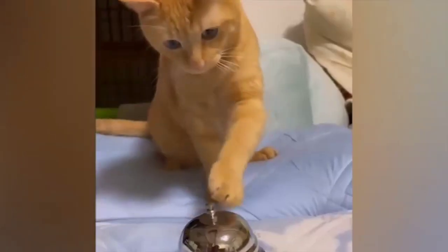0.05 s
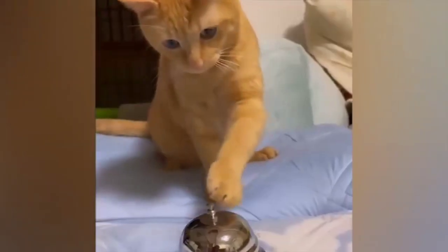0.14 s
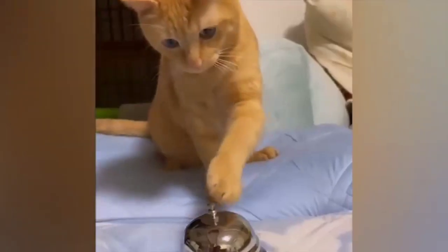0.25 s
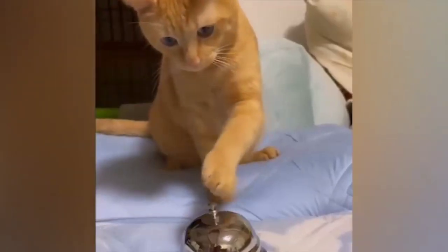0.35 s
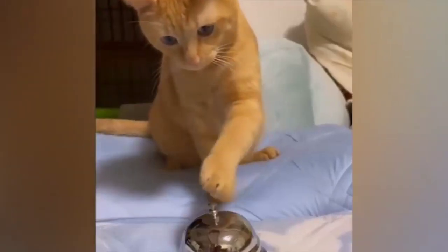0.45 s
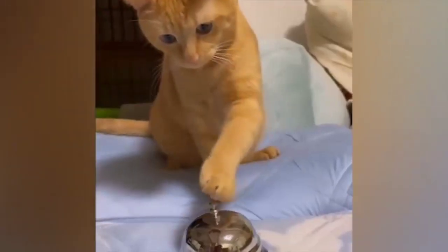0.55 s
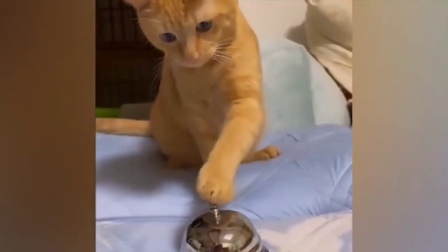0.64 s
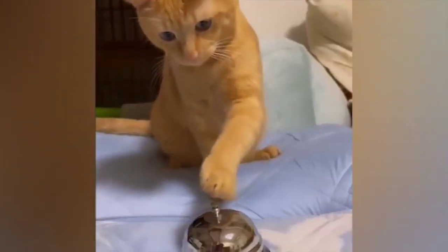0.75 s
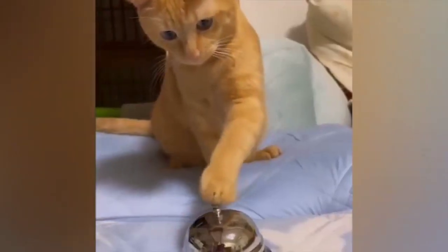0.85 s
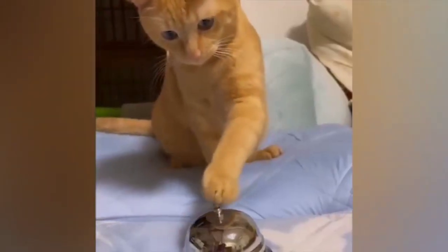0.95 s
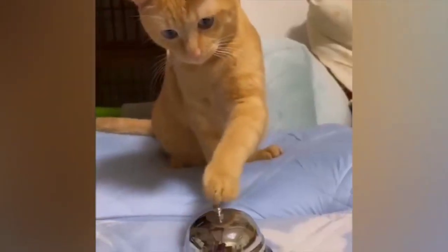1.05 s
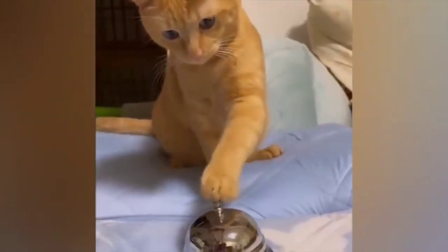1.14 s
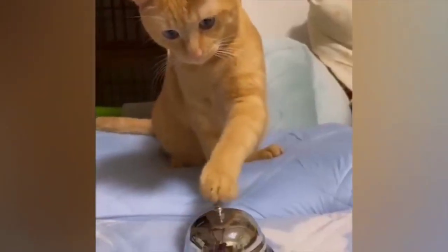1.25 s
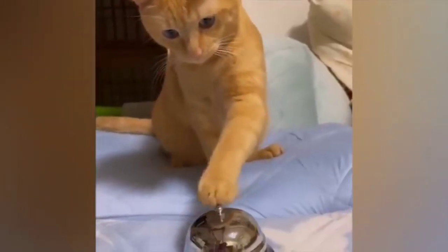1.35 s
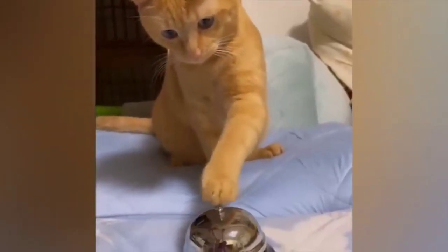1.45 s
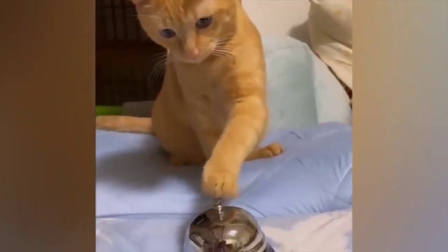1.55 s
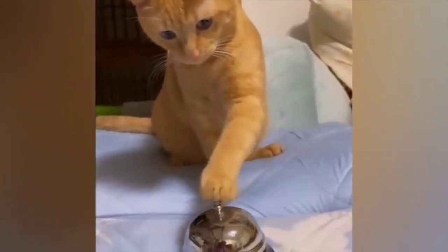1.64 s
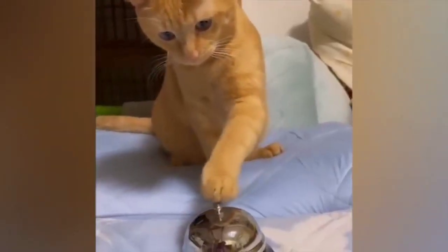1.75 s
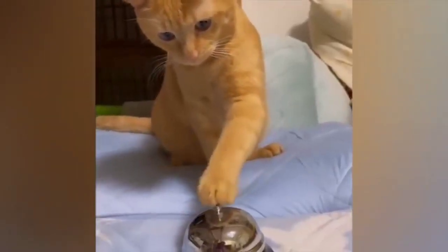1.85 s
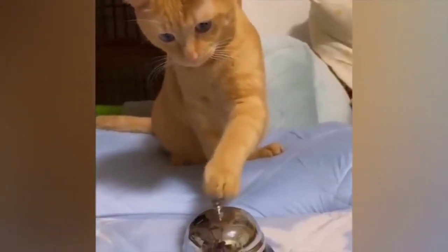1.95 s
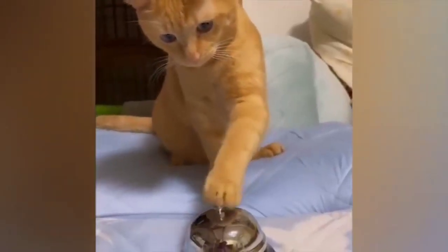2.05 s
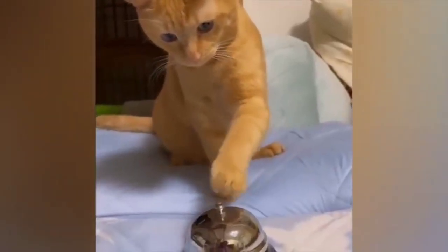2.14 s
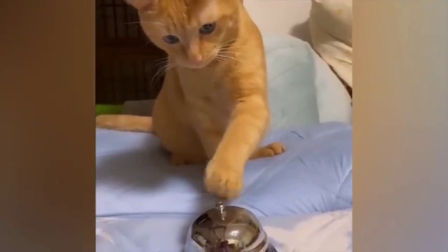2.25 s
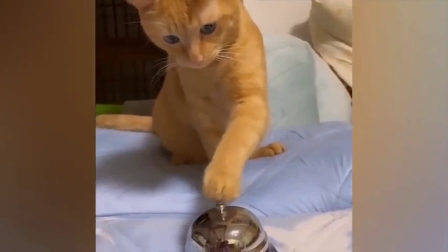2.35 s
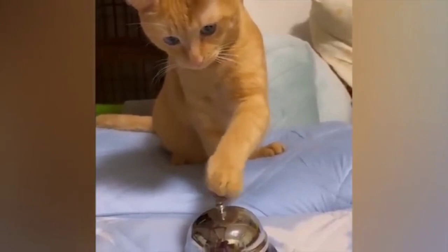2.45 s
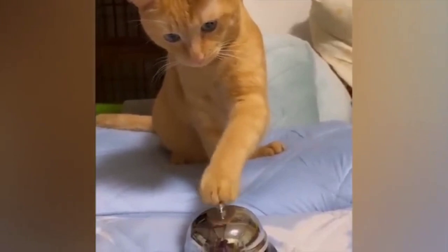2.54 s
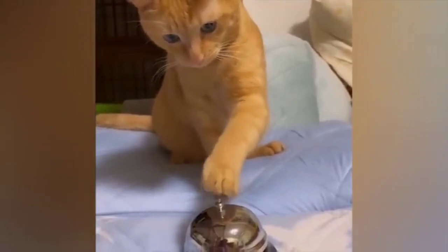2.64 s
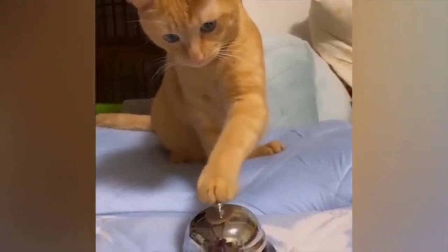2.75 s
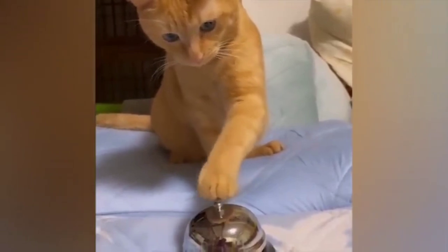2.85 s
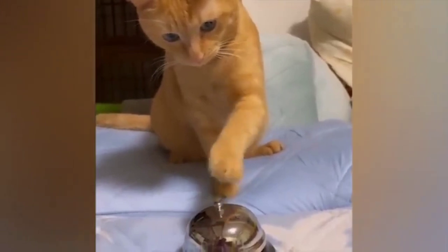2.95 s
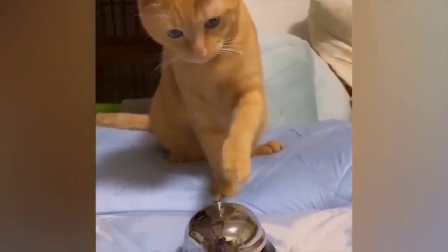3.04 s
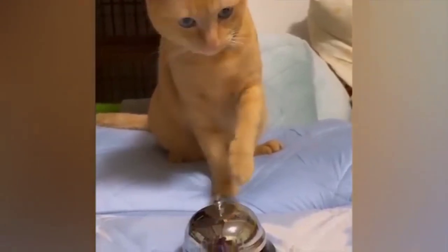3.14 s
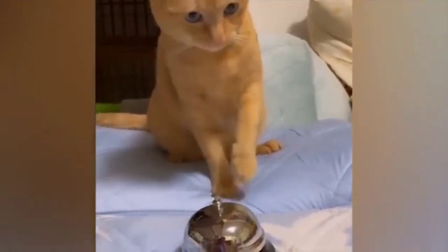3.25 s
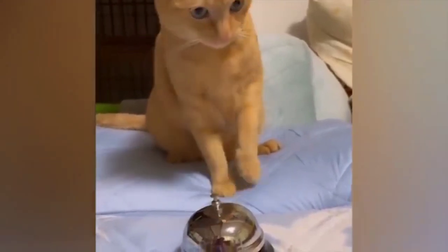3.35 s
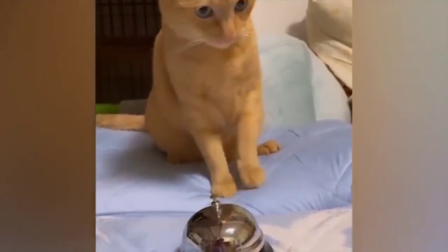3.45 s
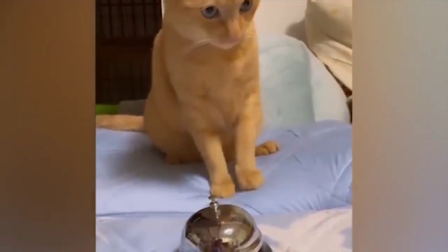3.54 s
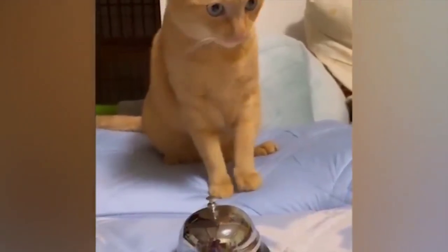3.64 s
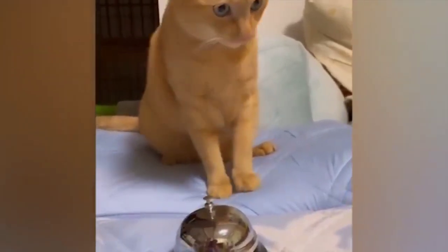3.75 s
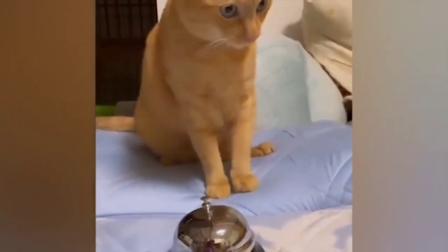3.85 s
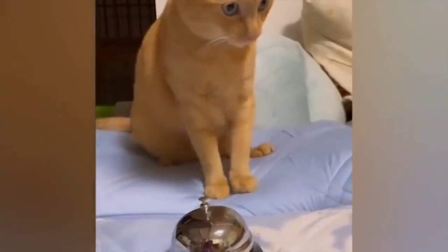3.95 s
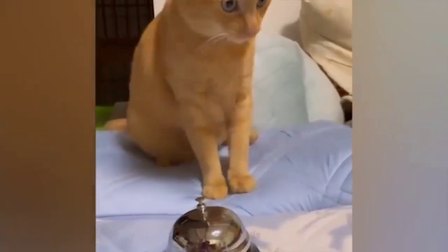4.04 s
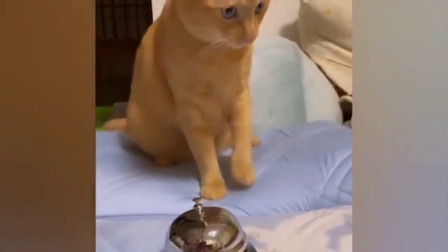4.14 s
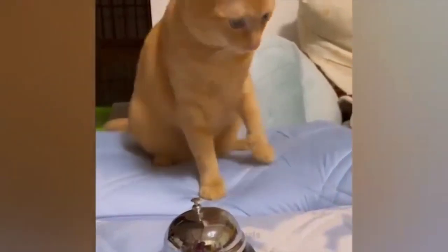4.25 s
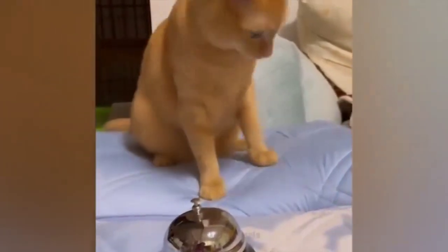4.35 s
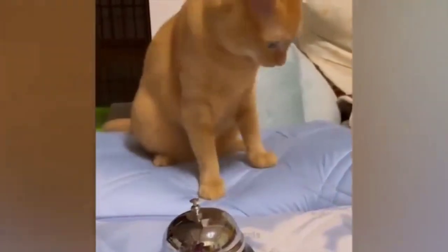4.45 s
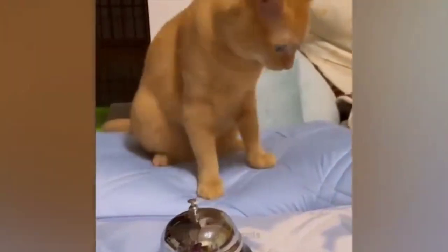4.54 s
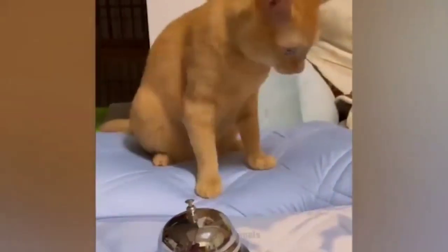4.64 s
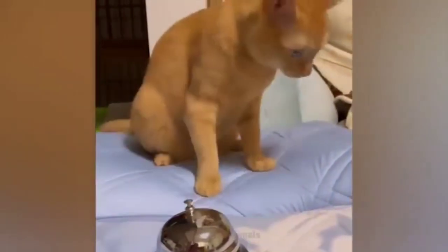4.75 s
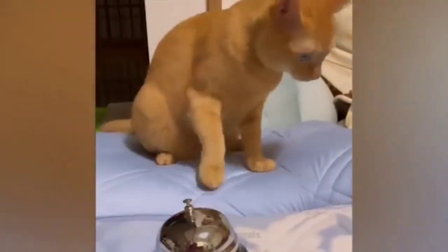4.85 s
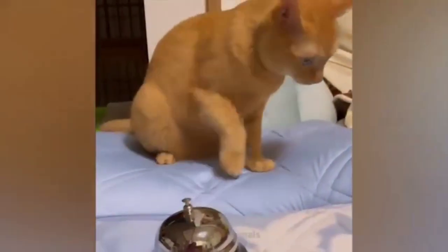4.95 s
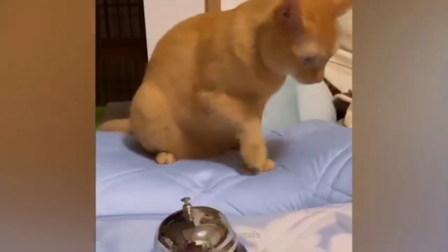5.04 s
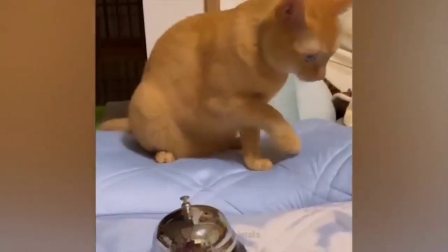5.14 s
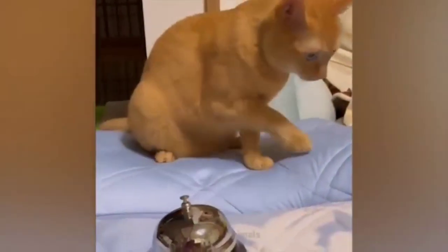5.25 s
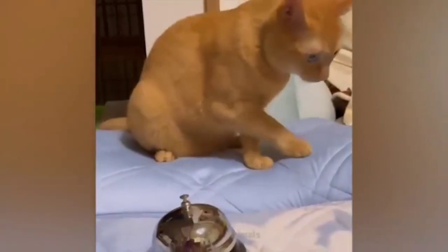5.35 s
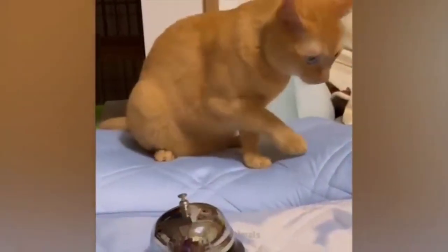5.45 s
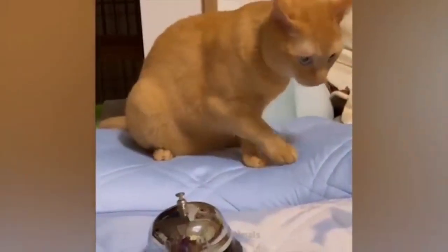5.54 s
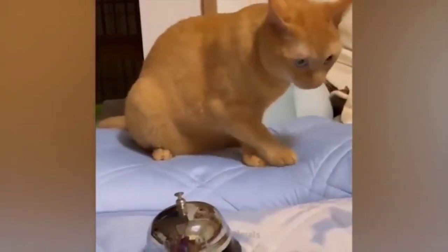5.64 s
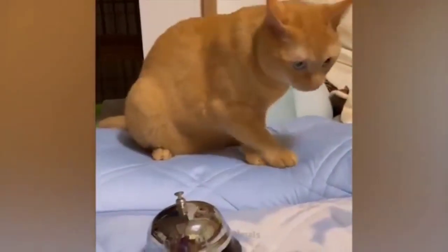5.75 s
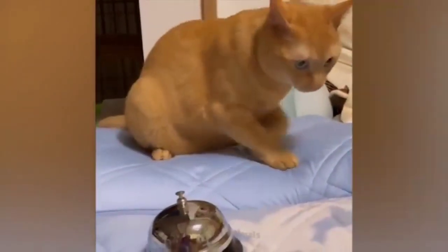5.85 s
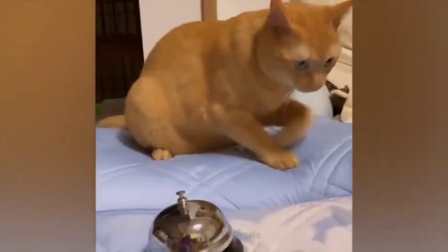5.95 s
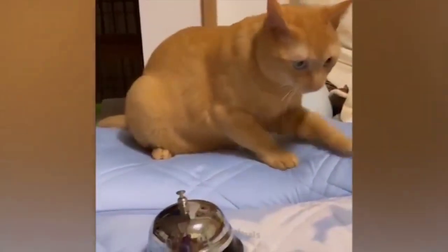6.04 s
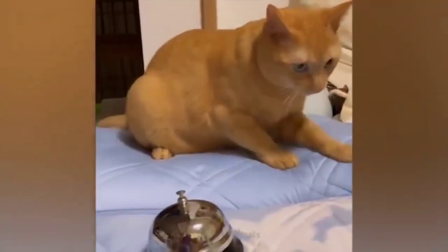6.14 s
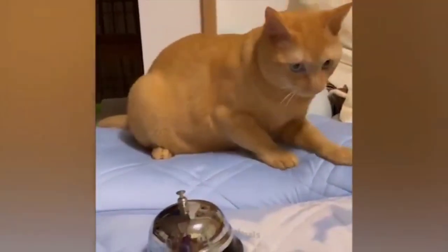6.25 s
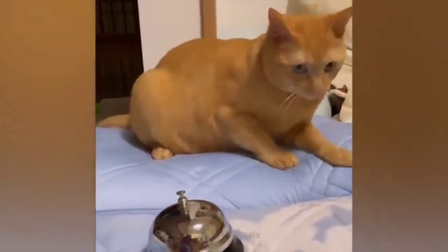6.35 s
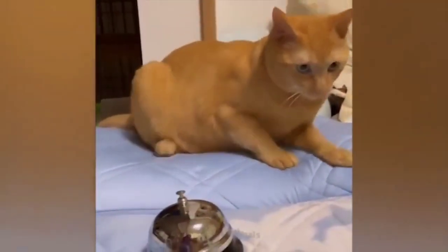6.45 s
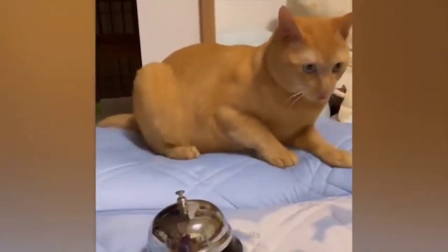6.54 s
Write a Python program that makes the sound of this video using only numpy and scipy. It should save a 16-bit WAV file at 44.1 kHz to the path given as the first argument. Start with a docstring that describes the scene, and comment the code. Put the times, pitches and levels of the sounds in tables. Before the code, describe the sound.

Loose metallic jingles and dull padded thumps, seven bright uneven dings from a desk bell, then a long shimmering fade in a quiet fan-hummed room.

```python
"""A steel desk bell on a quilt rings under a cat's paw: loose rattles, seven blows of the clapper, then the
dome rings out. Its close pairs of decaying sines beat; noisy contacts set the short modes of its loose parts
ringing, and the base thumps on the quilt. In the quiet room a fan drones, made of coloured noise and narrow
noise bands, and the quilt rustles in soft bright noise as the cat turns away."""
import sys
import numpy as np
from scipy import signal
from scipy.fft import rfft, irfft, next_fast_len
from scipy.io import wavfile

SR = 44100
rng = np.random.default_rng(int(sys.argv[2]) if len(sys.argv) > 2 else 0)


def int16_out(signal):
    """Quantize to a 16-bit WAV file."""
    q = np.round(np.clip(np.atleast_2d(signal).T, -1, 1) * 32767)
    wavfile.write(sys.argv[1], SR, q.astype(np.int16))


N = 290619

# Fan air noise: (frequency [Hz], relative density [dB per Hz])
AIR_SPECTRUM = [(25, -33), (60, -17.5), (100, -6), (145, -22.5), (230, -18), (280, -18), (350, -20.5),
                (520, -24.5), (700, -28.5), (1050, -27), (1400, -36), (2600, -43), (5000, -55),
                (11000, -73.5), (14000, -87)]
# Width of the air noise: (frequency [Hz], side minus mid [dB])
AIR_WIDTH = [(60, -39.5), (140, -44), (350, -14), (850, -5), (2040, -18), (4940, -1), (11900, -7)]
# Fan drone with the multiples of its turning rate: (frequency [Hz], bandwidth [Hz], level [dB])
FAN_DRONE = [(90.5, 4, -53.5), (119, 10, -56.5), (198, 16, -63), (313.5, 8, -58.5), (338, 8, -61),
             (363, 6, -66), (434, 4, -70), (457.5, 4, -69), (481, 4, -72)]
AIR_DB = -52.5  # rms of the mid signal

# Quilt and fur: (loudest time [s], level [dB], swell over 20 dB [s], fade over 20 dB [s])
CLOTH_MOVES = [(.866, -74, .035, 0.33), (4.198, -84, 0.16, 0.1), (5.03, -74.5, 1, 0.32),
               (5.84, -77.5, 0.06, .06), (5.97, -74.5, 0.18, 0.46), (6.45, -83, 0.13, 0.046)]
# Timbre of the cloth: (frequency [Hz], relative density [dB per Hz])
CLOTH_SPECTRUM = [(2500, -9.5), (4000, -1), (6500, -9.5), (9500, -6), (11000, -7), (12500, -12.5)]

# Plunger against its stop, with the thump of the base:
# (time [s], thump [dB], jingle [dB], dull modes against jingle [dB], tick drive [dB])
PLUNGER_KNOCKS = [(1.0250, -46.5, -38, -5.5, -24), (1.2158, -48.5, -46.5, -1, -25.5),
                  (1.3893, -43.5, -36, -7.5, -22), (1.704, -43, -38.5, -4, -23),
                  (1.842, -44.5, -56, -20, -28.5), (2.047, -43.5, -38, -10.5, -25.5),
                  (2.2204, -46, -50, -2, -29), (2.4042, -45.5, -39, -4, -22), (2.654, -43, -48, -2, -26),
                  (2.9051, -48.5, -38.5, -8.5, -27.5), (3.1307, -51.5, -49, -15, -41)]
# Loose plunger and clapper: (time [s], jingle [dB], dull modes against jingle [dB], patter t60 [s])
LOOSE_RATTLES = [(1.0104, -52, -10, 0.048), (1.059, -49, -11, 0.034), (1.152, -57.5, -5, .03),
                 (1.2815, -36.5, -5, 0.019), (1.3375, -34.5, -14.5, 0.047), (1.3988, -45.5, 3, .045),
                 (1.459, -32, -7.5, 0.017), (1.503, -44.5, -6, 0.033), (1.583, -55.5, 5.5, .045),
                 (1.607, -37, 1.5, 0.032), (1.7488, -27.5, -5, 0.07), (1.943, -64, 17, 0.031),
                 (2.0308, -42.5, -7, 0.093), (2.272, -46.5, -14, 0.091), (2.104, -47.5, -1, .045),
                 (2.1211, -22, -8.5, 0.043), (2.3117, -31.5, -1, 0.048), (2.357, -38, -1.5, 0.041),
                 (2.546, -33.5, -10, 0.13), (2.5655, -34, -5.5, 0.089), (2.7567, -32.5, -18, 0.026),
                 (2.7738, -23.5, -10.5, 0.021), (3.037, -32, -7, 0.049), (3.264, -53, -29, 0.063),
                 (3.287, -47.5, -32, 0.056), (3.325, -57, -3, 0.09)]
# Short modes of plunger, clapper and base: (frequency [Hz], relative level [dB], t60 [s])
FITTING_MODES = [(3198, 0.5, 0.0056), (3540, -7.5, 0.0099), (3580, -12.5, 0.013), (3993, -6.5, 0.026),
                 (4268, -16, 0.015), (4576, -5, 0.018), (4860, -12.5, 0.019), (5360, -9.5, 0.013),
                 (5720, -12, 0.0345), (6160, -14.5, 0.024), (6530, -5, 0.02), (6930, -4, 0.01),
                 (8180, -11, 0.011), (7750, -16, 0.01), (8890, -3.5, 0.048), (9480, 4.5, 0.011),
                 (9600, -7, .025), (10830, -3.5, 0.026), (11290, 0.5, 0.023), (12060, -10.5, 0.012)]
# Weak, brief dome modes: (frequency [Hz], level against clatter [dB], t60 [s])
WEAK_MODES = [(3500, -25, .18), (3800, -29, .15), (4072, -21.5, .17), (7150, -7, .05), (7420, -24, .12),
              (8889, -25, .25), (10455, -21, .3)]

# Clapper blows:
# (time [s], swing of the top mode [dB], opposite phase of the fourth pair lasts [s], snap against clatter [dB])
CLAPPER_BLOWS = [(1.6254, -19, 0.0072, 1.5), (1.7605, -11, 0.0033, 1), (2.1340, -13, 0.0062, 4),
                 (2.325, -15.5, 0.03, -2), (2.5805, -19.5, 0.01, 11), (2.788, -12.5, 0.017, 3.5),
                 (3.0477, -14, 0.012, 9)]
# Swing each blow leaves on the moving dome: (lower and upper mode of hum, second, third and fourth
# pair [dB] x 8, how far into their beat the second, third and fourth pair start [rad] x 3)
PAIR_SWINGS = [(-53, -57.5, -50.5, -56.5, -49.5, -47, -30, -28, -2.9, 0.8, 0.2),
               (-47.5, -48.5, -43.5, -48, -46, -41.5, -21.5, -28.5, -2, .8, 0.84),
               (-42.5, -53, -46.5, -51, -47.5, -39, -27.5, -25.5, 1.5, 0.6, .45),
               (-46.5, -53.5, -46, -47.5, -36, -42, -21.5, -48, 2.5, 0.45, .1),
               (-53, -50.5, -43, -43.5, -60, -45.5, -24, -29, -1.6, 1, .4),
               (-47.5, -48.5, -41.5, -48, -58, -43, -23.5, -27, 3, 1.1, 0.9),
               (-43.5, -63.5, -41, -48.5, -50, -46, -25, -25, -1.77, 1.5, 0.51)]

# The dome is not quite round, so modes come as close pairs that beat. The order of all mode tables is:
# hum, second, third and fourth pair, top mode, three side tones of the third. (frequency [Hz])
MODE_HZ = [934.6, 963.6, 2488.0, 2489.87, 4600.55, 4608.33, 7250.6, 7255.3, 10374.8, 4592.8, 4616.1,
           4623.85]
# Decay and stereo place of each mode: (t60 [s], left minus right [dB], left leads [rad])
MODE_DECAY_AND_PLACE = [(13.5, 2.47, -0.1), (5.3, -1.5, 0.2), (7.9, -5.5, 1.4), (6.1, 3, 2.1),
                        (2.6, -11, -0.35), (2.7, 5, -0.9), (1.08, 1.5, 0.0), (1.05, -0.5, 0.25),
                        (0.47, 0, 0.2), (2.4, 7, -1.7), (2.4, 8, -0.1), (2.4, 4, -1.1)]
# Most modes restart at a blow while the hum swings on: (restarts [0 or 1])
MODE_RESTARTS = [0, 0, 1, 1, 1, 1, 1, 1, 1, 1, 1, 1]
# Which swing sets the mode: (column of PAIR_SWINGS, with the blow's strength added last [index])
MODE_SWING_COLUMN = [0, 1, 2, 3, 4, 5, 6, 7, 11, 5, 5, 5]
# Which beat start sets the lower mode of a pair ahead: {mode [index]: column of PAIR_SWINGS [index]}
MODE_BEAT_COLUMN = {2: 8, 4: 9, 6: 10}
# Faint side tones follow the third tone: (offset [dB])
SIDE_TONE_DB = [0, 0, 0, 0, 0, 0, 0, 0, 0, -12, -9, -15.5]
# Where the side tones start: (phase [rad])
MODE_AHEAD_RAD = [0, 0, 0, 0, 0, 0, 0, 0, 0, -.6, 1.5, -1.2]
# Random slow level waver of each mode: (spread [dB])
MODE_WAVER_DB = [.2, .2, .3, .3, 1.0, 1.0, 1.5, 1.5, .7, 1.0, 1.0, 1.0]
# The pressing paw changes the modes just before the next blow, muffling most: (change [dB])
MODE_MUFFLE_DB = [1.5, -3, -2, -1.5, -4, 1.5, -18.5, -26.5, 1, -5.5, -4, -3.5]
# Level change at the blow that fades as the mode rings: (change [dB])
MODE_EARLY_DB = [-2, -2.5, 2, 1.5, -3, 1.5, -7, -2, 2.5, -0.5, -0.5, 0]
# How fast that change fades, for modes below and above BRIGHT_FROM_HZ: (time constant [s])
EARLY_FADE_S = [0.0493, 0.0081]
# Regular level swing laid over the fourth pair, timed from each blow: (peak swing [dB])
MODE_LEVEL_SWING_DB = [0, 0, 0, 0, 0, 0, 3.5, 3.5, 0, 0, 0, 0]
# Left and right start in opposite phase for this pair: (opposite [0 or 1])
MODE_OPPOSITE_START = [0, 0, 0, 0, 0, 0, 1, 1, 0, 0, 0, 0]

WAVER_PER_S, MUFFLE_S = 35, 0.03
LEVEL_SWING_PER_S, LEVEL_SWING_LAG_S = 22.5, 0.019  # lag from the blow to the top of the swing
OPPOSITE_RAD, OPPOSITE_DB = 3.13, 3
BRIGHT_FROM_HZ = 7500  # splits bright modes from dull ones

TOUCHES_PER_S, SHAKE_RISE_S = 520, 0.003
PATTER_T60_S, BLOW_PATTER_T60_S = 0.084, 0.064
BRIGHT_DB = -4  # bright modes against the jingle of a rattle or knock
CLATTER_DB = -12.5  # clatter against the strength of a blow
HIT_COLOUR_DB = 5.5  # spread of each mode's share from one hit to the next
BOUNCE_S, BOUNCE_DB, BOUNCE_DULL_DB = 0.022, -15, 6.5  # the clapper falls back after each blow
JINGLE_LEAD_S = 0.0025  # the plunger jingles just before it meets its stop
LEAD_IN_DB, LEAD_IN_S = -12.5, 0.052  # soft noisy lead-in that rises 60 dB in this time before each hit
SWELL_T60_S = 0.0055  # padded contacts let the small modes swell briefly
TICK_HZ, TICK_T60_S, TICK_LAG_S = 2026, 0.0023, 0.00089
RATTLE_TICK_DB = 4  # tick drive against the dull modes
PARTS_LOWEST_HZ = 650  # the small parts radiate no bass

THUMP_HZ, THUMP_T60_S = 618, 0.036
THUD_HZ, THUD_T60_S, THUD_DB = 199, 0.058, 4  # the quilt under the base, against the thump
ROOM_T60_S, ROOM_DB, ROOM_DULL_HZ, ROOM_WIDE_HZ = 0.24, -7.5, 5700, 2000
CUTOFF_HZ = 12700


def amp(db):
    """Turn decibels into gain."""
    return 10 ** (np.asarray(db) / 20)


def rms_one(x):
    """Scale to rms 1."""
    return x / np.sqrt(np.mean(x ** 2) + 1e-20)


def coloured(points, channels):
    """Shape white noise to a spectrum of (frequency [Hz], level [dB]) points."""
    size = next_fast_len(N)
    hz = np.maximum(np.arange(size // 2 + 1) * SR / size, 1)
    at, level_db = np.transpose(points)
    colour = amp(np.interp(np.log(hz), np.log(at), level_db))
    white = rng.standard_normal((channels, size))
    return irfft(rfft(white) * colour, size)[:, :N]


def drift(rate):
    """Low-pass noise twice into a slow random wander of spread 1; rate is the corner in Hz."""
    r = np.exp(-2 * np.pi * rate / SR)
    wander = signal.lfilter([1], [1, -2 * r, r * r], rng.standard_normal(N + SR))
    return rms_one(wander[SR:])  # drop the filter's start


def ring(clicks, hz, t60):
    """A two-pole resonance: a unit click sets a dying sine of height 1 ringing."""
    r, w = amp(-60 / (t60 * SR)), 2 * np.pi * hz / SR
    return signal.lfilter([0, np.sin(w)], [1, -2 * r * np.cos(w), r * r], clicks + 1e-18)


def smooth(x, time_s):
    """Ease jumps with a one-pole lag of this time constant."""
    r = np.exp(-1 / (time_s * SR))
    return signal.lfilter([1 - r], [1, -r], x)


def clicks_at(times, db):
    """Place one click at each time."""
    out = np.zeros(N)
    out[np.round(np.asarray(times) * SR).astype(int)] = amp(db)
    return out


def fan():
    """Broad air noise, its width varying with pitch, and a wavering drone of narrow noise near the middle."""
    at, level_db = np.transpose(AIR_SPECTRUM)
    width_hz, width_db = np.transpose(AIR_WIDTH)
    side_db = level_db + np.interp(np.log(at), np.log(width_hz), width_db)
    mid = coloured(AIR_SPECTRUM, channels=1)[0]
    side = coloured(np.c_[at, side_db], channels=1)[0]
    air = amp(AIR_DB) / np.std(mid) * (mid + side * [[1], [-1]])
    drone = np.zeros(N)
    for hz, width, tone_db in FAN_DRONE:
        t60 = np.log(1000) / (np.pi * width)
        band = ring(ring(rng.standard_normal(N + SR), hz, t60), hz, t60)
        drone += amp(tone_db) * rms_one(band[SR:])
    return air + drone * amp([[0.15], [-0.15]])


def rustle(patchy_db=1.5):
    """Fur and paws on cloth: soft bright noise in patches."""
    t = np.arange(N) / SR
    level = np.zeros(N)
    for peak, db, swell, fade in CLOTH_MOVES:
        distance = np.where(t < peak, (peak - t) / swell, (t - peak) / fade)
        level += amp(db - 20 * distance)
    mid, side = rms_one(coloured(CLOTH_SPECTRUM, channels=2))
    return level * amp(patchy_db * drift(19)) * (mid + 0.4 * side * [[1], [-1]])


def room(x):
    """A dense dull tail, alike at both microphones in the bass and different in the treble."""
    t = np.arange(SR // 2) / SR
    tail = rng.standard_normal((2, len(t))) * amp(-60 * t / ROOM_T60_S)
    tail *= t > 0.004  # short gap before the reflections
    mid, side = signal.sosfilt(signal.butter(1, ROOM_DULL_HZ, fs=SR, output="sos"), tail)
    side = signal.sosfilt(signal.butter(2, ROOM_WIDE_HZ, "high", fs=SR, output="sos"), side)
    tail = (mid + side * [[1], [-1]]) / np.sqrt(np.sum(mid ** 2 + side ** 2))
    return amp(ROOM_DB) * signal.fftconvolve(x[None], tail, axes=1)[:, :N]


def thumps(times, db):
    """The hollow base answers a knock with a rounded tone that swells before it dies, over a quilt thud."""
    thud = ring(clicks_at(times, db + THUD_DB), THUD_HZ, THUD_T60_S)
    once = ring(clicks_at(times, db), THUMP_HZ, THUMP_T60_S)
    level = 2 * np.e * np.log(1000) / (THUMP_T60_S * SR)  # brings the swell to a height near 1
    return thud + level * ring(once, THUMP_HZ, THUMP_T60_S)


def shaking(times, db, t60):
    """How hard the loose parts shake: a soft lead-in, a quick rise at each time, then a fall."""
    t, out = np.arange(SR // 5) / SR, np.zeros(N)
    for start, level_db, fall in zip(times, db, t60):
        at = round(start * SR)
        out[at - len(t):at] += amp(level_db + LEAD_IN_DB - 60 * t[::-1] / LEAD_IN_S)
        rise = 1 - np.exp(-t / SHAKE_RISE_S)
        out[at:at + len(t)] += rise * amp(level_db - 60 * t / np.clip(fall, 0.01, 0.15))
    return out


def contacts(times, uneven_db=4.5):
    """Loose parts touch at random with uneven force, plus one sure touch for each hit."""
    force_db = uneven_db * np.minimum(rng.exponential(1, N), 3) - 12.5
    touches = (rng.random(N) < TOUCHES_PER_S / SR) * amp(force_db)
    return touches + clicks_at(times + SHAKE_RISE_S, 0.7)


def fittings():
    """Rattles, knocks and blows shake the loose parts: uneven, fading contacts ring short modes."""
    rattles, knocks, blows = np.array(LOOSE_RATTLES), np.array(PLUNGER_KNOCKS), np.array(CLAPPER_BLOWS)
    blow_s, clatter_db = blows[:, 0], blows[:, 1] + CLATTER_DB
    bounces = [(s + BOUNCE_S, db + BOUNCE_DB, BOUNCE_DULL_DB, PATTER_T60_S)
               for s, db in zip(blow_s, clatter_db)]
    rattles = np.r_[rattles, bounces]
    rattle_s, rattle_db, rattle_dull_db, rattle_t60 = rattles.T
    knock_s, _, knock_db, knock_dull_db, knock_tick_db = knocks.T

    times = np.r_[rattle_s, knock_s - JINGLE_LEAD_S, blow_s]
    t60s = np.r_[rattle_t60, np.full(len(knocks), PATTER_T60_S), np.full(len(blows), BLOW_PATTER_T60_S)]
    bright_db = np.r_[rattle_db + BRIGHT_DB, knock_db + BRIGHT_DB, clatter_db - 17.5]
    dull_db = np.r_[rattle_db + rattle_dull_db, knock_db + knock_dull_db, clatter_db - 13.5]
    # no two hits stir the modes alike
    colour_db = HIT_COLOUR_DB * rng.standard_normal((len(times), len(FITTING_MODES)))
    touches = contacts(times)
    patter = np.zeros(N)
    for k, (hz, level_db, t60) in enumerate(FITTING_MODES):
        hit_db = (bright_db if hz > BRIGHT_FROM_HZ else dull_db) + colour_db[:, k]
        drive = shaking(times, hit_db, t60s) * touches * rng.standard_normal(N)
        patter += amp(level_db) * ring(ring(drive, hz, t60), hz, SWELL_T60_S)
    patter *= 3 * np.log(1000) / (SWELL_T60_S * SR)  # offsets the gain of the second resonance

    tick_s = np.r_[rattle_s + SHAKE_RISE_S, knock_s + TICK_LAG_S, blow_s]
    tick_db = np.r_[rattle_db + rattle_dull_db + RATTLE_TICK_DB, knock_tick_db, clatter_db - 12]
    # two resonances in a row: a soft contact swells for a cycle
    once = ring(clicks_at(tick_s, tick_db), TICK_HZ, TICK_T60_S)
    ticks = amp(-20) * ring(once, TICK_HZ, TICK_T60_S)

    steel = clicks_at(blow_s, clatter_db)  # steel on steel
    crack = amp(7.5) * ring(steel, 2700, 0.0008) + amp(-4.0) * ring(steel, 10960, 0.0012)
    snap = clicks_at(blow_s, clatter_db + blows[:, 3])
    crack += amp(3.5) * ring(snap, 9173, 0.0069)
    thin = signal.butter(2, PARTS_LOWEST_HZ, "high", fs=SR, output="sos")
    return signal.sosfilt(thin, patter + ticks + crack)


def overtones():
    """Each blow strikes the weak modes with strengths of its own."""
    blows = np.array(CLAPPER_BLOWS)
    luck_db = rng.normal(0, 2.5, (len(blows), len(WEAK_MODES)))
    out = np.zeros(N)
    for k, (hz, db, t60) in enumerate(WEAK_MODES):
        strike_db = blows[:, 1] + CLATTER_DB + db + luck_db[:, k]
        out += ring(clicks_at(blows[:, 0], strike_db), hz, t60)
    return out


def dome(rise_s=0.000506, muffle_rise_s=0.003):
    """Every blow leaves each mode with a new swing, which then dies away; close pairs beat."""
    blows, t, out = np.array(CLAPPER_BLOWS), np.arange(N) / SR, np.zeros((2, N))
    blow_s = blows[:, 0]
    swings = np.c_[PAIR_SWINGS, blows[:, 1]]
    last = np.searchsorted(blow_s, t) - 1  # latest blow, -1 before the first
    since = np.maximum(t - blow_s[np.maximum(last, 0)], 0)
    until = np.r_[blow_s, np.inf][last + 1] - t
    muffled = smooth(1.0 * (until < MUFFLE_S), muffle_rise_s) * (since > MUFFLE_S)
    level_swing = np.cos(2 * np.pi * LEVEL_SWING_PER_S * (since - LEVEL_SWING_LAG_S))
    for k, (hz, (t60, pan_db, lead)) in enumerate(zip(MODE_HZ, MODE_DECAY_AND_PLACE)):
        swing_db = swings[last, MODE_SWING_COLUMN[k]] + SIDE_TONE_DB[k] - 60 * since / t60
        swing_db += MODE_MUFFLE_DB[k] * muffled
        swing_db += MODE_EARLY_DB[k] * np.exp(-since / EARLY_FADE_S[int(hz > BRIGHT_FROM_HZ)])
        swing_db += MODE_LEVEL_SWING_DB[k] * level_swing
        swing = smooth((last >= 0) * amp(swing_db), rise_s)
        swing = swing * amp(MODE_WAVER_DB[k] * drift(WAVER_PER_S))

        clock = since if MODE_RESTARTS[k] else t - blow_s[0]
        phase = MODE_AHEAD_RAD[k] + 2 * np.pi * hz * clock
        if k in MODE_BEAT_COLUMN:
            phase = phase + swings[last, MODE_BEAT_COLUMN[k]]
        opposite = smooth(1.0 * (since < MODE_OPPOSITE_START[k] * blows[last, 2]), rise_s)
        swing = swing * amp(OPPOSITE_DB * opposite)
        lead = lead + OPPOSITE_RAD * opposite
        for side, sign in enumerate((1, -1)):
            out[side] += amp(sign * pan_db / 2) * swing * np.sin(phase + sign * lead / 2)
    return out


def scene():
    """Mix fan and cloth, the base muffled by the quilt, the loose parts in the room, and the dome."""
    knocks = np.array(PLUNGER_KNOCKS)
    base = thumps(knocks[:, 0], knocks[:, 1])
    parts = fittings() + overtones()
    direct_parts = parts * amp([[0.3], [-0.3]])
    return fan() + rustle() + base + direct_parts + room(parts) + dome()


def record(dry):
    """Cut the top steeply: from the cutoff up, everything lies at least 34 dB down."""
    return signal.sosfilt(signal.cheby2(8, 34, CUTOFF_HZ, fs=SR, output="sos"), dry)


dry = scene()
out = record(dry)
int16_out(out)
```